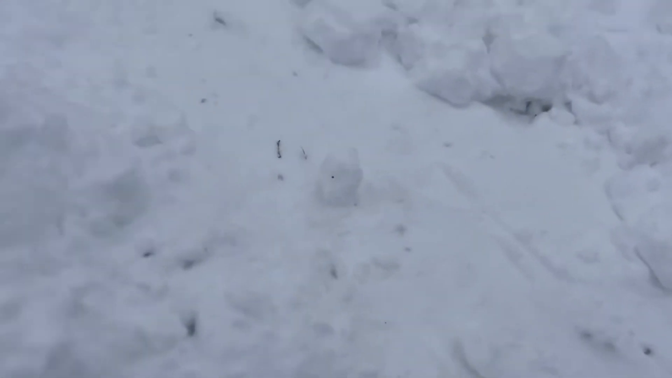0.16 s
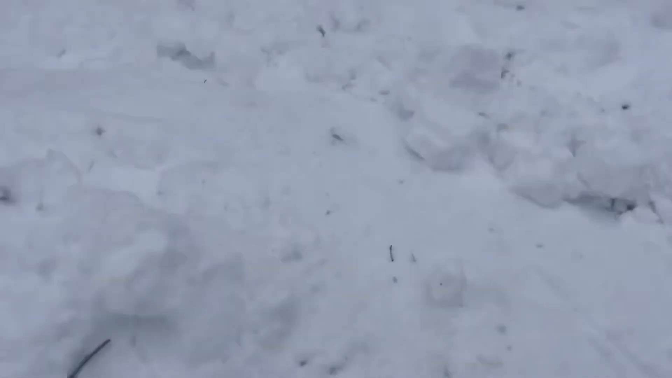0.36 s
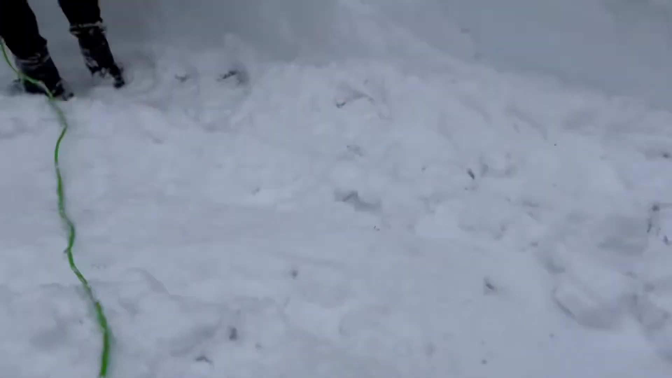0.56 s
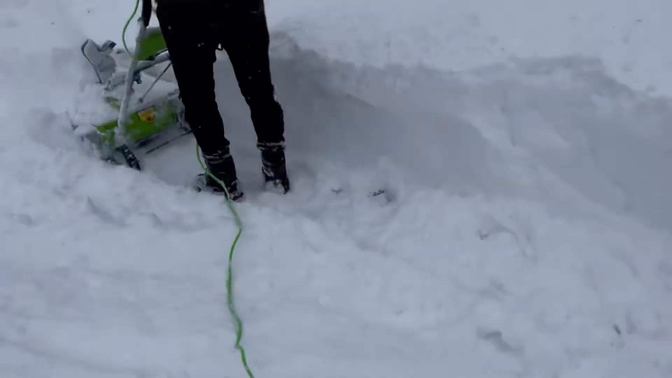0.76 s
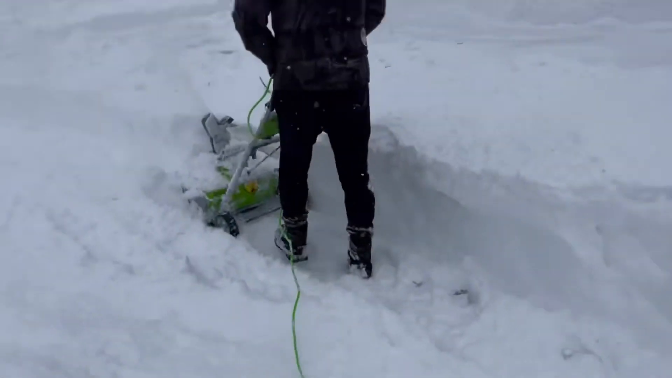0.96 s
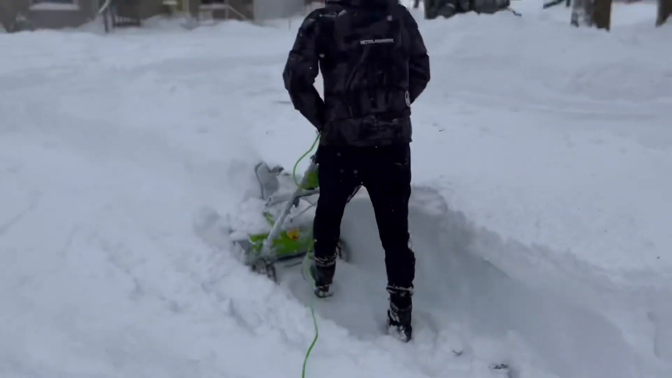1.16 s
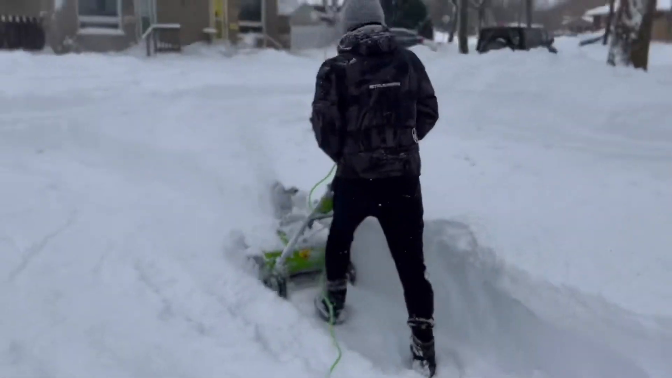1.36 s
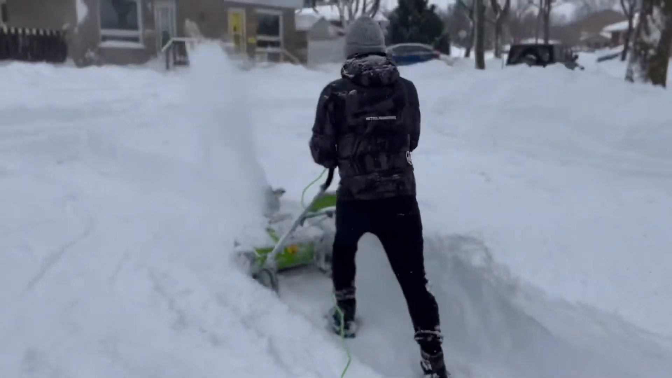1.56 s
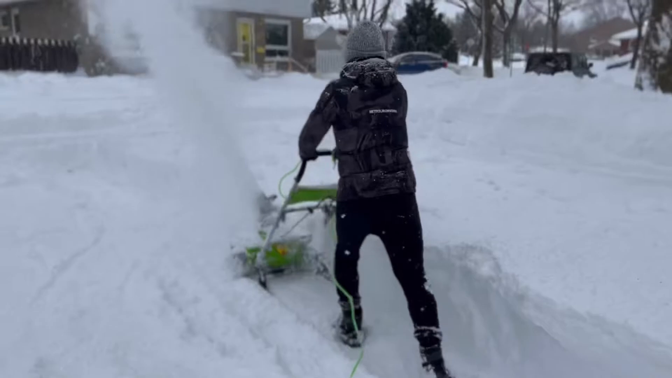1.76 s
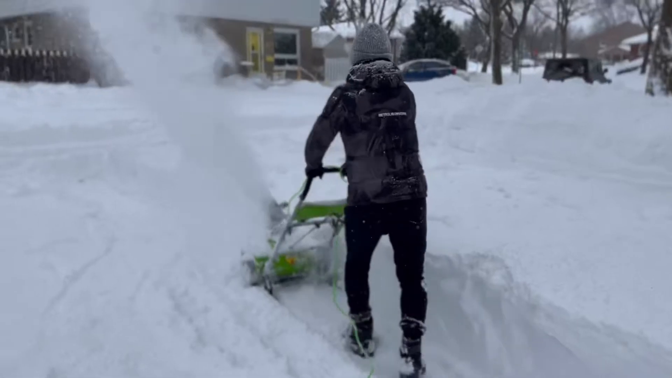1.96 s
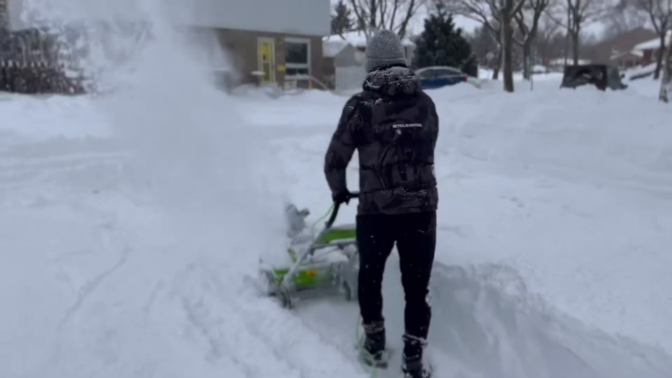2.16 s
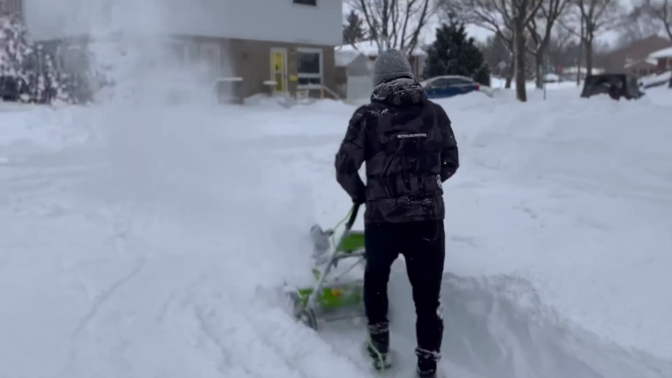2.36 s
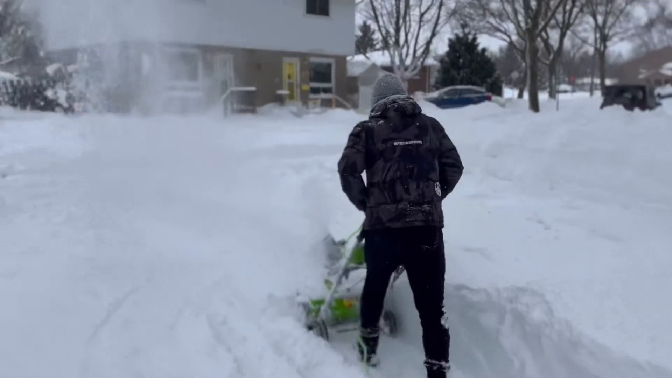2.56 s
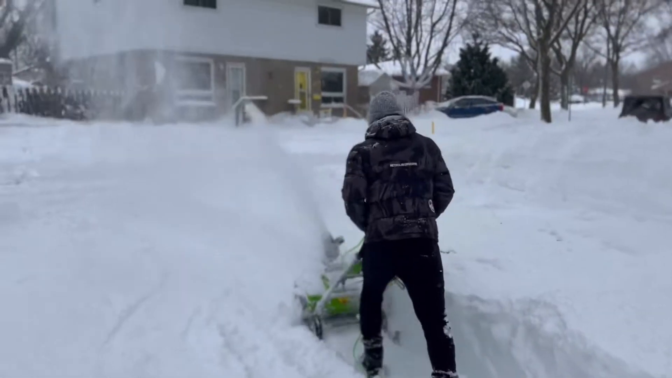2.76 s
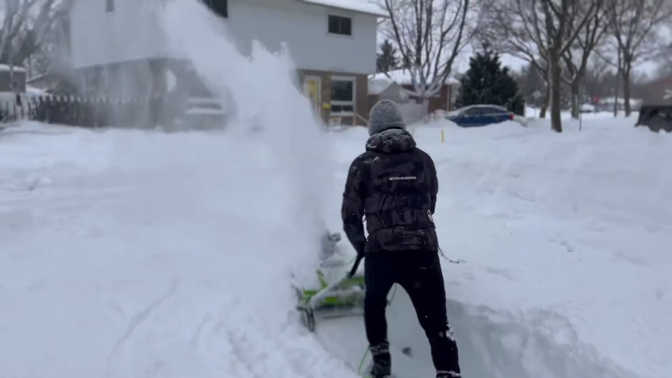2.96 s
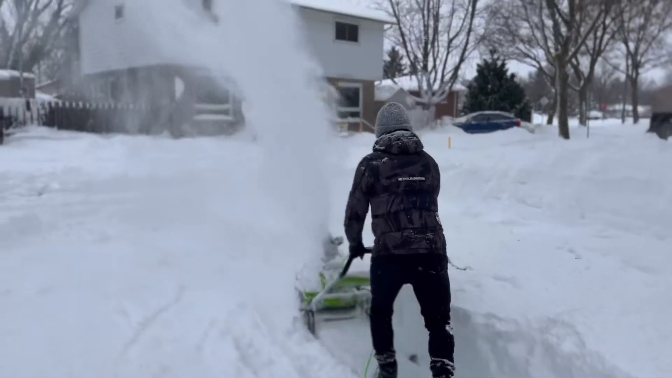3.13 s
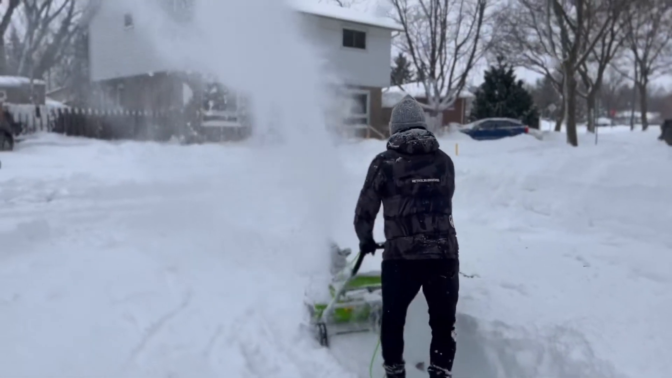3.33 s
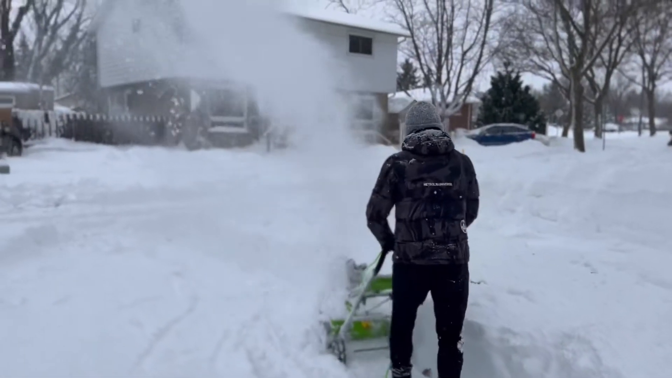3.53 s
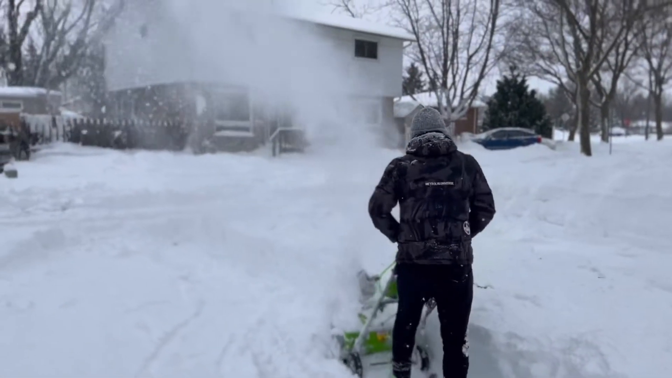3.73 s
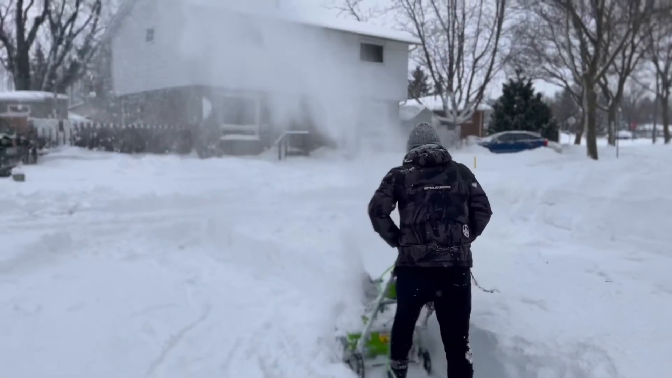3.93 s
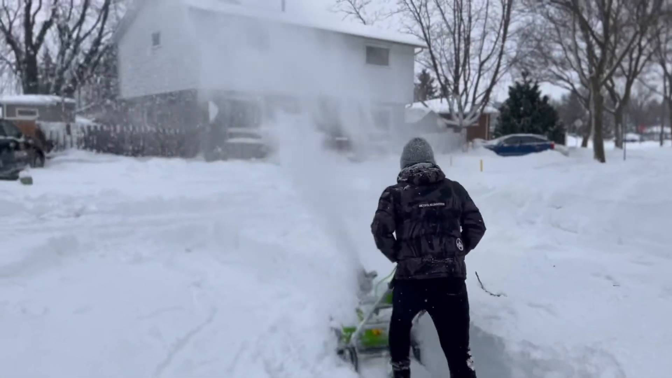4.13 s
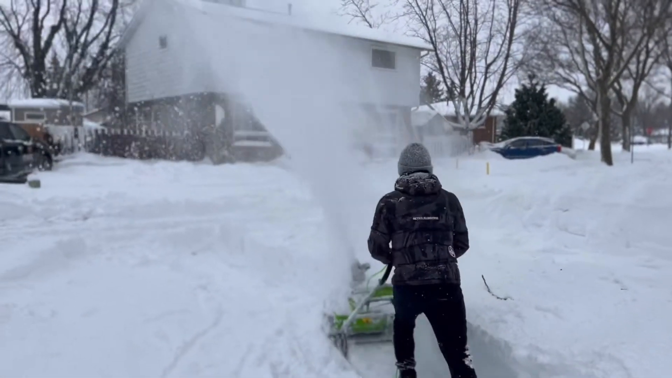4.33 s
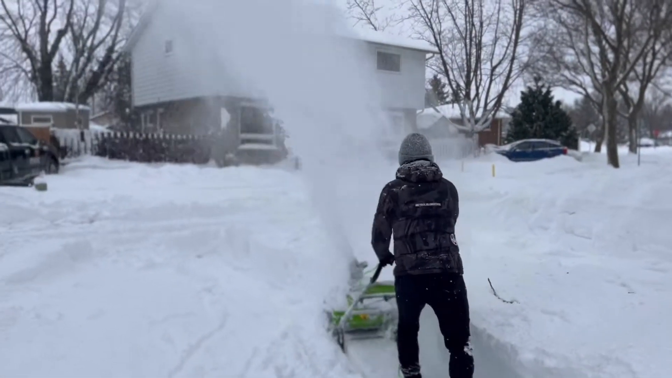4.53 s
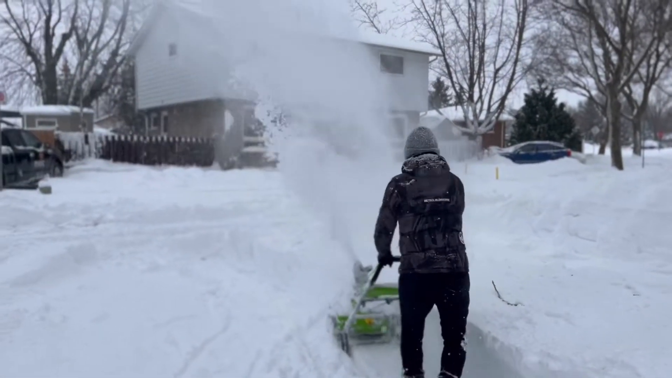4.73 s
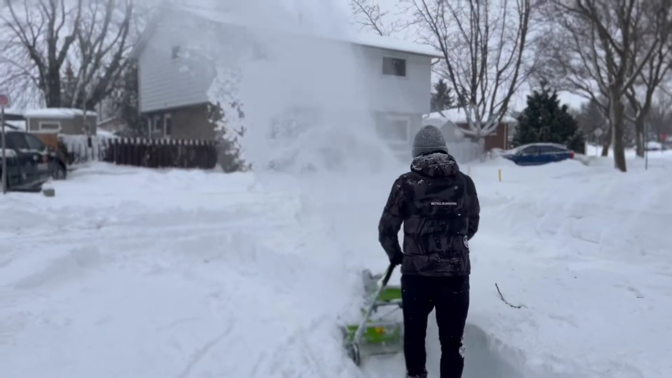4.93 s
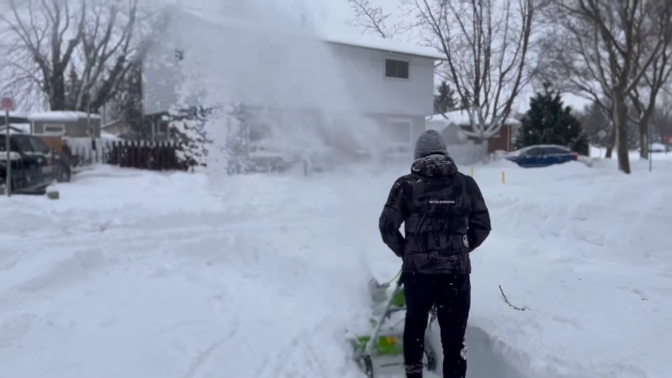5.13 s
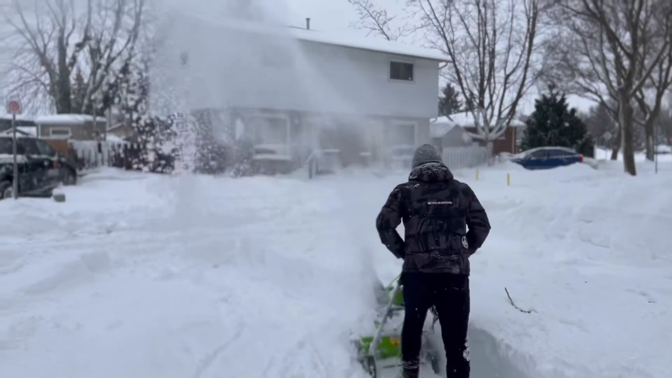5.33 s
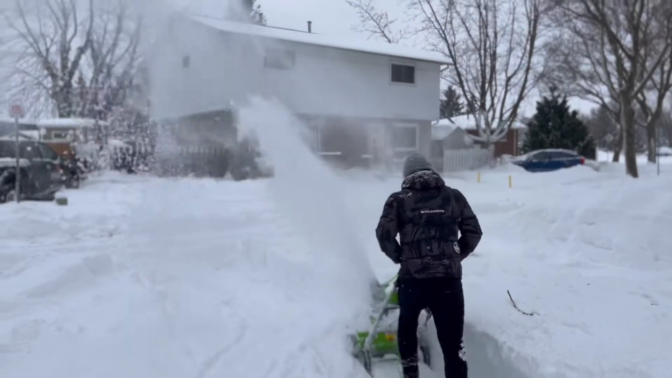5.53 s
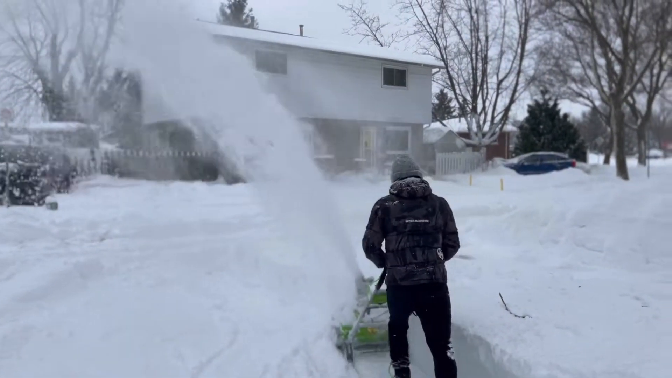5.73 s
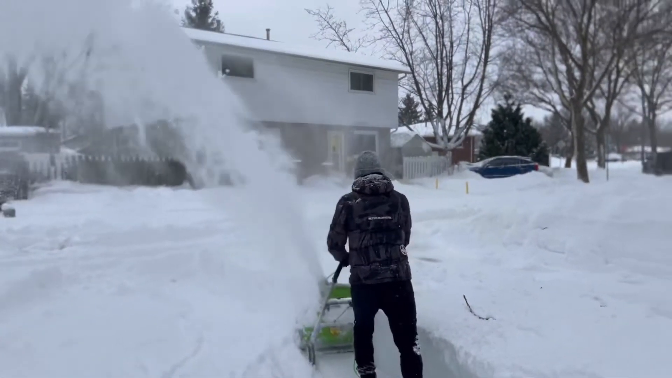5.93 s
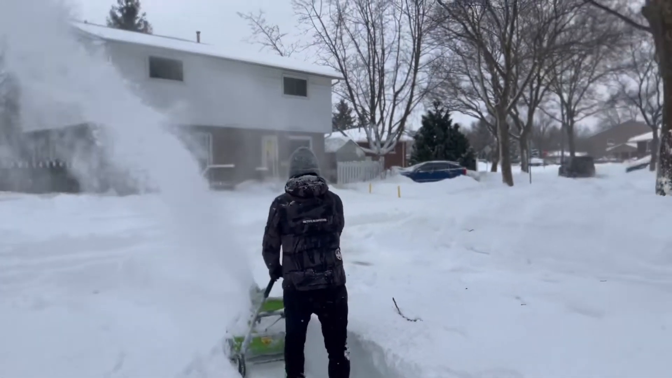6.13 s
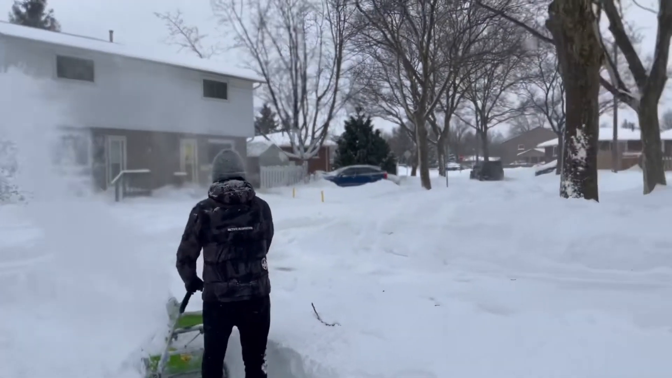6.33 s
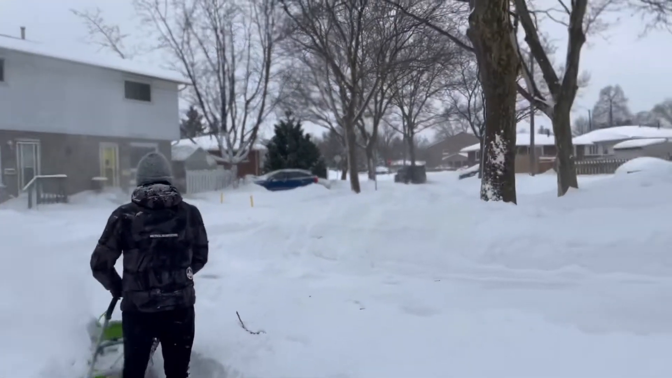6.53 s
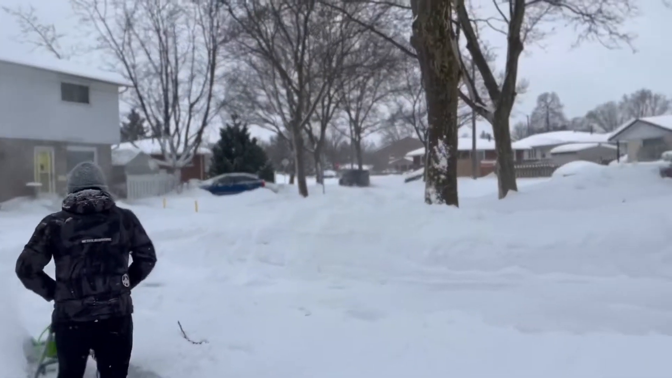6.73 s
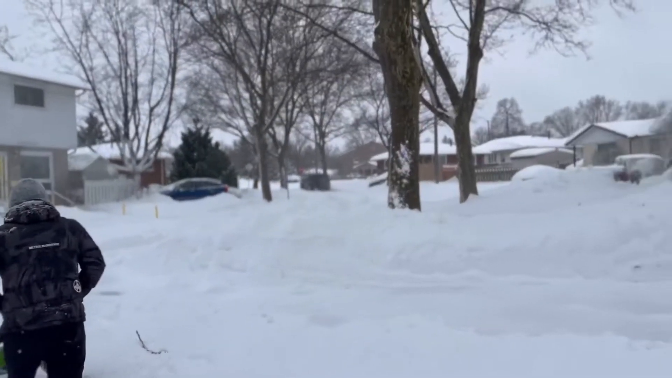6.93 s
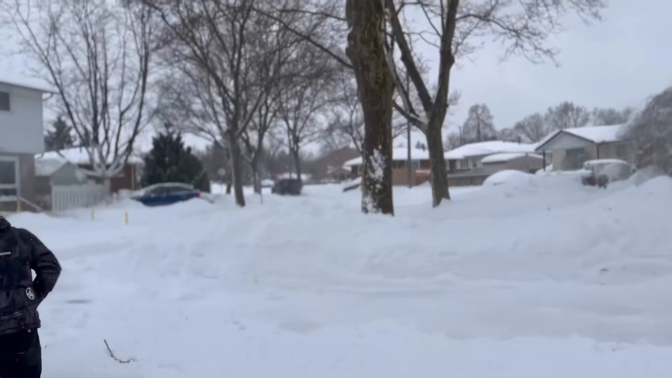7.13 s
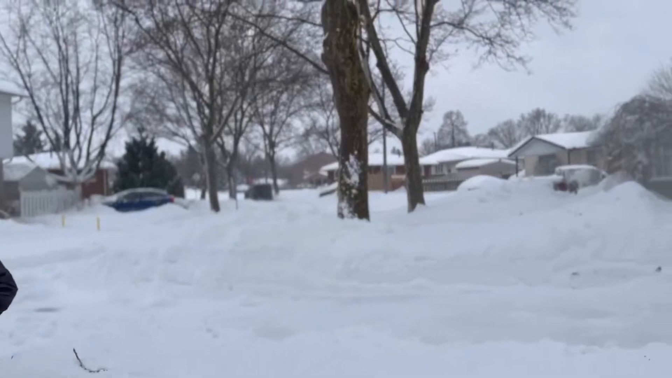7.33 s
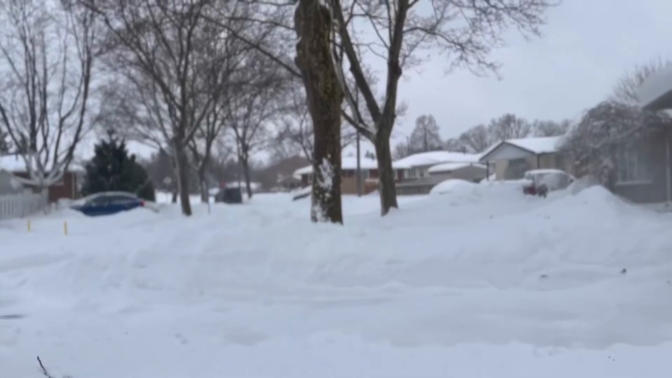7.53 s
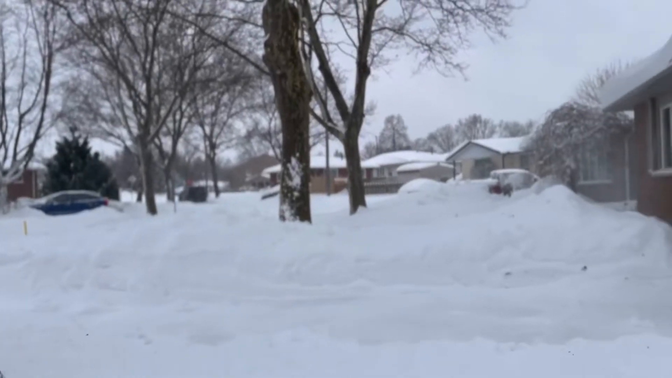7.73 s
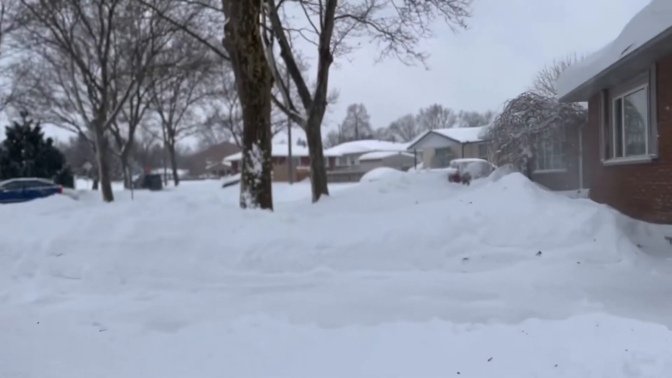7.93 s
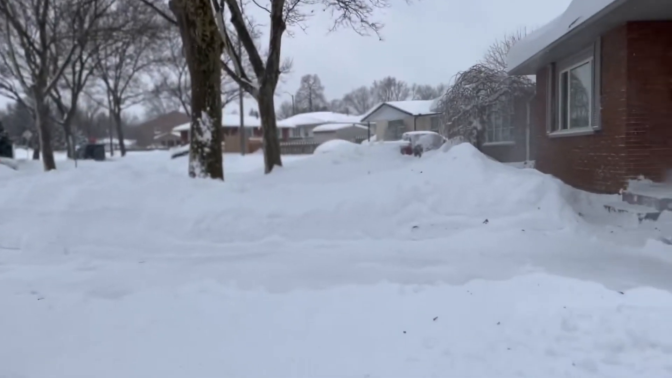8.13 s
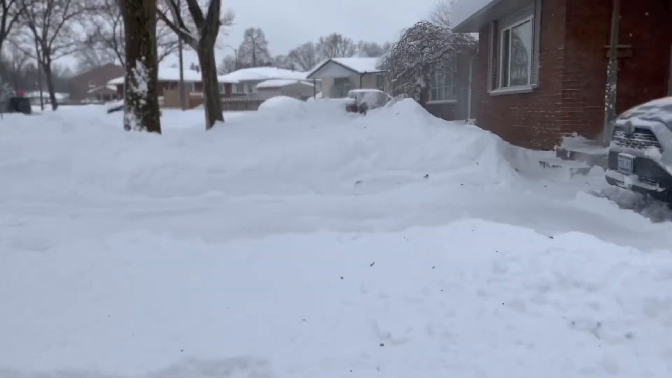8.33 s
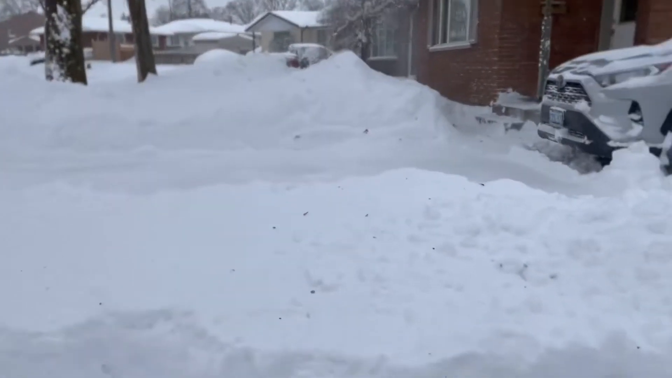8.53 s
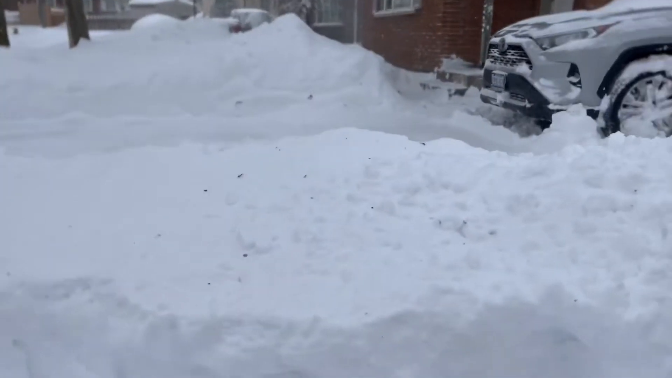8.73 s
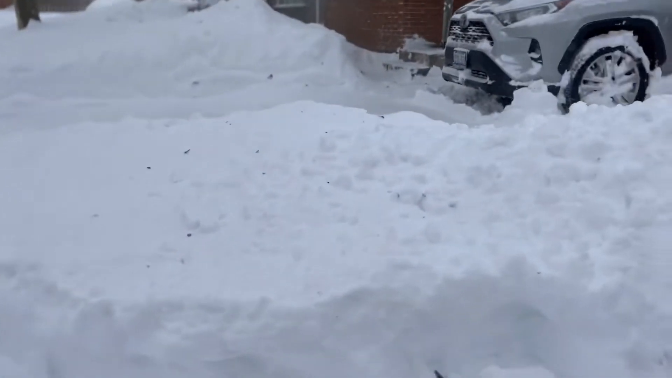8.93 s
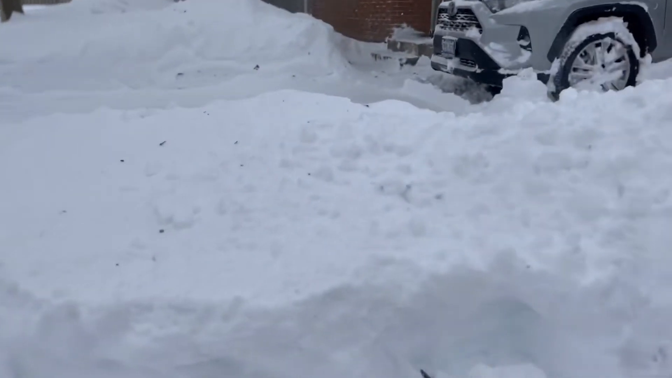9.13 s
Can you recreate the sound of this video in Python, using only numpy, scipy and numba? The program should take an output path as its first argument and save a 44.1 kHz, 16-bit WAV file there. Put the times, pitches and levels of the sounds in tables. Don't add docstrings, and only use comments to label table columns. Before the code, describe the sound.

Outdoors on a snowy street, an electric snow blower runs a few metres from a hand-held phone. Its shaft hum, fan whine and airy hiss drop in pitch and level whenever the auger bites the drift, with deep rapid thumps and snow slapping up the chute, then climb back. Ice lumps knock now and then, and wind gusts thud on the stereo microphones.

```python
import sys
import numpy as np
from scipy import signal
from scipy.fft import rfft, irfft, next_fast_len
from scipy.io import wavfile
from scipy.ndimage import uniform_filter1d, map_coordinates
from numba import njit

SR = 44100
rng = np.random.default_rng(int(sys.argv[2]) if len(sys.argv) > 2 else 0)


def generate_wav(sig):
    pcm = np.round(np.clip(np.atleast_2d(sig).T, -1, 1) * 32767).astype(np.int16)
    wavfile.write(sys.argv[1], SR, pcm)


def gain_from_db(level_db):
    decades = np.asarray(level_db, float) / 20
    return 10 ** decades


N = 409688
T = np.arange(N) / SR
PADDED = next_fast_len(N + SR // 2)
F = np.fft.rfftfreq(PADDED, 1 / SR) + 1

# (frequency [Hz], density [dB per Hz])
STREET_SPECTRUM = [(150, -27), (350, -10.5), (1200, -4.5), (3000, -13), (9000, -18.5), (16000, -19.5)]
# (frequency [Hz], density [dB per Hz])
WIND_SPECTRUM = [(20, -35), (35, -18.5), (55, -3), (100, -3.5), (180, -9), (270, -15.5), (340, -27),
                 (600, -53)]
# (peak time [s], swell [s], fade [s], level [dB])
GUSTS = [(0, .1, 0.1, -31.5), (0.441, 0.15, 0.18, -25.5), (.66, 0.075, 0.11, -30), (1.47, .05, 0.49, -21.5),
         (1.94, 0.49, .3, -27), (2.12, 0.092, 0.12, -24), (2.33, 0.068, 0.23, -22),
         (3.04, .15, 0.15, -28.5), (3.97, 0.066, 0.093, -21), (4.1, .05, 0.26, -31),
         (4.22, 0.11, 0.17, -19), (4.6, 0.59, 0.24, -30), (5.28, .25, 1, -21.5), (5.68, 0.14, 0.2, -23),
         (6.29, 0.22, .1, -22), (6.45, 0.3, 0.78, -25.5), (6.78, 0.47, 0.18, -29), (7.14, .12, 0.28, -18.5),
         (7.4, 0.25, 0.17, -16), (7.58, .1, 0.97, -28.5), (8.33, 0.19, 0.65, -27.5),
         (8.61, 0.062, 0.23, -25.5), (8.87, 0.23, 0.45, -20.5), (8.999, .06, 0.031, -18),
         (9.15, 0.16, 0.79, -36)]
# (time [s], peak level [dB], pitch [Hz], left minus right [dB])
PUFFS = [(1.87, -15, 184, 4), (2.106, -6, 176, 7), (4.495, -16, 150, -0.5), (5.819, -17, 114, -17),
         (6.262, -2.5, 92, 3), (7.449, -12, 127, 6), (7.548, -8.5, 117, 7), (7.653, -12.5, 151, 3),
         (7.696, -9, 89, 4), (8.817, -7, 85, 5), (8.995, -7, 215, 3), (9.173, -18, 182, 15)]
# (time [s], delay [ms])
GROUND_DELAY = [(0, 3.1), (.6, 2.33), (1.5, 2.28), (4, 2.2), (6, 1.76), (7, 2.1), (9.29, 2.57)]
# (time [s], right microphone lag [ms], housing side [dB], motor side [dB], cowl opening [dB])
PLACE = [(0, 0.448, -9, 0, 4.5), (.33, 0.45, -2, 3.5, 6), (.5, 0.444, 3, 3.5, 4), (.7, 0.28, 5.5, 2.5, 1.5),
         (.9, 0.097, 0.5, 1, 3.5), (1.3, 0.094, 4, -1, 4.5), (2.1, 0.094, 0.5, 2, 1.5),
         (2.5, 0.071, 1, 1, 3.5), (3.5, 0.053, -5, -4, 0.5), (4.1, 0.019, 0, -5, 2),
         (5, 0.044, -3, -0.5, 1), (5.5, 0.022, 0, -7, 3), (5.9, .061, -2.5, -6, 7.5),
         (6.4, 0.28, -4, 4.5, -1), (7, 0.32, -2, 2.5, -2.5), (7.7, .41, -2, 0.5, 6.5),
         (8.3, 0.48, -4, 0.5, 6.5), (9.29, 0.554, -8.5, -3, 2)]
# (frequency [Hz], left minus right [dB])
MICROPHONE_SHADE = [(60, -1), (110, 0), (200, -1.5), (380, 2), (700, 4.5), (1290, 3.5), (2380, -3),
                    (4400, 11), (8120, 6.5), (15000, -48)]
# (frequency [Hz], gain [dB])
SUM_TOP = [(9400, .5), (9900, -11.5), (11000, -7), (12900, -6.5), (13600, -35), (14600, -9), (15750, -9),
           (16000, -50)]
# (frequency [Hz], gain [dB])
DIFFERENCE_TOP = [(9000, -0.5), (10400, 5.5), (11000, -10), (12900, -3), (13600, -36), (14600, -8),
                  (15750, -15), (16000, -52)]
# (time [s], ring level [dB], pitch [Hz], crack level [dB])
KNOCKS = [(1.965, -20, 650, -53), (2.596, -11, 570, -40), (2.838, -29, 530, -18.5), (2.93, -46, 600, -20.5),
          (3.073, -22.5, 583, -45), (3.173, -24, 580, -50), (3.818, -9.5, 600, -49), (3.878, -13, 597, -38),
          (4.21, -33, 600, -23), (4.27, -26, 520, -22.5), (5.238, -13, 605, -40)]
# (frequency [Hz], width [Hz], level [dB])
COWL = [(1950, 390, 1), (2507, 220, 3.5), (2930, 185, 2.5), (3400, 290, -3.5)]
# (frequency [Hz], width [Hz], level [dB])
VENTS = [(4430, 340, 0), (4833, 220, 3.5), (5490, 450, 2.5), (6086, 240, 6), (6420, 830, 2.5),
         (7440, 720, 3), (8114, 570, 0), (8117, 104, 5.5), (8790, 840, 0)]
# (frequency [Hz], density [dB per Hz])
AIR_HISS = [(180, -39), (300, 4), (440, -10.5), (1510, -10), (2280, -9), (3640, -9.5), (8090, -25),
            (11500, -34.5), (13800, -56), (14500, -49), (16000, -43)]
# (peak time [s], swell [s], fade [s], level [dB])
GRIT = [
    (2.33, .15, 0.089, -40),
    (2.92, 0.56, .2, -44),
    (4.2, 0.31, 0.028, -48),
]
# (start time [s], rise [s], fall [s], peak drag [Hz per s])
BITES = [(1.25, .15, .1, 150), (1.42, .11, .19, 1650), (1.619, .065, .267, 615), (2.541, .122, .403, 496),
         (2.767, .09, .33, 770), (3.799, .374, .253, 451), (4.185, .037, .207, 980),
         (4.31, .094, .215, 584), (5.188, .311, .298, 665), (5.49, .29, .25, 690), (6.918, .301, .443, 744),
         (7.269, .223, .364, 561), (9.061, .198, .175, 1367)]
# (peak time [s], swell [s], fade [s], thump level [dB], slap level [dB])
CLUMPS = [(1.32, 0.51, 0.28, -20, -30), (1.502, 0.047, 0.079, 2, -21.5), (1.62, 0.11, 0.13, -22.5, -54),
          (2.35, 0.04, 0.1, -33, -38), (2.698, .12, 0.088, -2.5, -20), (2.848, 0.14, 0.17, -3.5, -25.5),
          (3.24, 0.17, 0.17, -15.5, -33.5), (3.96, 0.59, 0.21, -25, -26.5),
          (4.06, 0.24, 0.12, -14.5, -28.5), (4.14, 0.15, 0.14, -9, -26.5), (4.24, 0.3, 0.098, -17.5, -31),
          (4.33, 0.14, 0.1, -19, -60), (5.35, .2, 0.3, -15.5, -22), (5.43, 0.058, 0.24, -7, -25.5),
          (5.54, 0.3, 0.13, -6, -45), (5.64, 0.17, 0.21, -10, -47), (5.77, 0.24, 0.11, -18, -54),
          (5.92, 0.2, 0.08, -21.5, -60), (6.26, 0.057, 0.052, -17, -34), (7.141, 0.21, 0.31, -5, -22),
          (7.291, 0.2, 0.11, 1.5, -28), (7.43, .2, 0.16, -20.5, -54), (9.03, .04, 0.18, -25, -34),
          (9.19, 0.045, 0.034, -3, -23.5)]
# (frequency [Hz], width [Hz], level [dB])
HOUSING = [(91.36, 3.4, 11.5), (112.6, 17, 6), (137, 37, -2.5), (219, 23.6, 4), (360, 750, -39),
           (530, 26, -31), (570, 170, -15)]
# (frequency [Hz], width [Hz], level [dB])
PACKED_HOUSING = [(118.5, 39.3, 1.5), (212.8, 44, 3)]
# (frequency [Hz], width [Hz], level [dB])
CHUTE = [(416, 520, 3.5), (652, 590, 10.5), (880, 630, 0), (1276, 56, -3)]
# (frequency [Hz], gain [dB])
SOFT_BLOW = [(300, 0), (800, -6), (1200, -22), (2500, -55)]

BELT_RATIO, FAN_BLADES = 6.52, 14
FREE_HZ, SPIN_UP_S = 286.5, 0.2624
EDGE_DB = 18
CALM_DB = -34
SCATTER_DRIFT_S = 5
HUM_DB, HUM_PER_OCTAVE = -22.5, 8.2
THUMP_DB, THUMP_PER_OCTAVE = -17.5, 22
SLAP_DB, SLAP_PER_OCTAVE = -32, 8.2
ROAR_DB, ROAR_PER_OCTAVE = -30, 19
HISS_DB, HISS_PER_OCTAVE = -36, 21
WHINE_DB = -32.5
HUM_STRAIN_DB, ROAR_STRAIN_DB, HISS_STRAIN_DB, WHINE_STRAIN_DB = 5, 3, 3.5, -4.5
IDLE_FADE_DB_PER_S, IDLE_FADE_FROM_S, IDLE_FADE_FOR_S = 2.5, 0.83, 4.4


def noise():
    return rng.standard_normal(N)


def level(x, db):
    return x * gain_from_db(db) / np.sqrt(np.mean(x ** 2))


def steady(x):
    return x / np.sqrt(uniform_filter1d(x ** 2, size=5000) + 1e-12)


def walk(rate):
    hold = int(SR / rate)
    steps = np.repeat(rng.standard_normal(N // 100)[:N // hold + 1], hold)
    return 1.32 * uniform_filter1d(uniform_filter1d(steps, hold), hold)[:N]


def swells(base_db, events, column):
    power = gain_from_db(2 * base_db) + 0 * T
    for event in events:
        peak_s, swell_s, fade_s = event[:3]
        away = np.maximum((peak_s - T) / swell_s, (T - peak_s) / fade_s)
        power += gain_from_db(2 * (event[column] - EDGE_DB * away))
    return 10 * np.log10(power)


def colour(x, points, share=1):
    hz, db = np.transpose(points)
    gain_db = share * np.interp(np.log(F), np.log(hz), db)
    return irfft(rfft(x, PADDED) * gain_from_db(gain_db), PADDED)[..., :N]


def ring(x, modes):
    gain = 0
    for k, (hz, width, db) in enumerate(modes):
        gain = gain + (-1) ** k * gain_from_db(db) / (1 + 1j * (F - hz ** 2 / F) / width)
    return irfft(rfft(x, PADDED) * gain, PADDED)[..., :N]


@njit
def svf(x, hz, width):
    y, band, low = np.empty(len(x)), 0., 0.
    for i in range(len(x)):
        g, k = np.tan(np.pi * hz[i] / SR), width / hz[i]
        v = (band + g * (x[i] - low)) / (1 + g * (g + k))
        band, low, y[i] = 2 * v - band, low + 2 * g * v, k * v
    return y


def street():
    mid, side = (level(colour(noise(), STREET_SPECTRUM), -44) for _ in range(2))
    return mid + gain_from_db(1) * side * np.array([[1], [-1]])


def wind():
    gust = gain_from_db(swells(CALM_DB, GUSTS, column=3) + 6)
    eddies = (ring(noise() * gain_from_db(2.2 * walk(22)), [(200, 900, 0)]) for _ in range(2))
    mid, side = (level(colour(eddy, WIND_SPECTRUM + [(2000, -90)]), 0) for eddy in eddies)
    out = gust * (mid + gain_from_db(-7.5) * side * np.array([[1], [-1]]))
    t = T[:SR // 10]
    envelope = np.exp(-t / 0.017) * (1 - np.exp(-t / 0.0017))
    for s, db, hz, pan_db in PUFFS:
        thud = np.sin(2 * np.pi * hz * (t + 0.0052 * (1 - np.exp(-t / 0.0038)))) * envelope
        start = int(s * SR)
        out[:, start:start + len(t)] += gain_from_db(db + np.array([[pan_db], [-pan_db]]) / 2) * thud
    return out


def scatter(blower):
    t = T[:SR // 8]
    tails = rng.standard_normal((2, 2, len(t))) * np.exp(-t / 0.03) * (t > 0.003)
    thin = ring(blower, [(4020, 30000, 0.0089)])
    drift = 2 * np.pi * T / SCATTER_DRIFT_S
    out = np.zeros((2, N))
    for share, tail in zip((np.sin(drift), np.cos(drift)), tails):
        out += signal.fftconvolve((thin * share)[None], tail * gain_from_db(-33), axes=1)[:, :N]
    return out


def ground_echo(blower):
    late = np.arange(N) - np.interp(T, *np.transpose(GROUND_DELAY)) * SR / 1000
    return 0.27 * map_coordinates(ring(blower, [(4300, 3700, 0)]), [late])


def two_microphones(blower, lag_ms):
    half_lag = lag_ms * SR / 1000 / 2
    left = map_coordinates(blower, [np.arange(N) + half_lag], mode="nearest")
    right = map_coordinates(blower, [np.arange(N) - half_lag], mode="nearest")
    return np.array([colour(left, MICROPHONE_SHADE, 0.5), colour(right, MICROPHONE_SHADE, -0.5)])


def knocks():
    out, t = np.zeros(N), T[:SR // 20]
    for s, db, hz, crack_db in KNOCKS:
        grain = uniform_filter1d(rng.standard_normal(len(t)), size=3)
        crack = gain_from_db(crack_db) * grain * np.exp(-t / 0.0026)
        start = int(s * SR)
        out[start:start + len(t)] += gain_from_db(db) * np.sin(2 * np.pi * hz * t) * np.exp(-t / 0.0037) + crack
    return out


def fan(hz, turns, roar_db, hiss_db, whine_db):
    once_a_turn = np.sin(2 * np.pi * turns)
    roar = level(ring(ring(noise(), COWL), [(2583, 830, 0)]), 0) * gain_from_db(roar_db - 5 + 1.3 * walk(23))
    air = level(colour(noise(), AIR_HISS), 0) * gain_from_db(0.9 * walk(30))
    air += level(ring(ring(noise(), VENTS), VENTS), -2) * gain_from_db(1.1 * walk(20))
    air -= ring(air, [(8330, 25000, 0.0039)]) * (1 - gain_from_db(-0.8 * T))
    blades = (1 + 0.9 * once_a_turn) * np.sin(2 * np.pi * FAN_BLADES * turns + 0.5 * walk(100))
    blades += level(svf(noise(), FAN_BLADES * hz, 200.), -7)
    whine = ring(ring(blades, [(2330, 255, 0.0058)]), [(1950, 253, 0.0058)])
    whine *= gain_from_db(whine_db + 3.3 * walk(30))
    return (1 + 0.14 * once_a_turn) * (roar + gain_from_db(hiss_db + 3.5) * air) + whine


def hum(turns, db):
    phase = 2 * np.pi * turns + 0.33 * walk(40)
    octave = gain_from_db(-14) * ring(np.sin(2 * phase), [(520, 39, 0.0036)])
    return gain_from_db(db + walk(16)) * np.sqrt(2) * (np.sin(phase) + octave)


def auger(turns, idle_db, thump_db, slap_db):
    strokes = 2 * turns / BELT_RATIO + 0.006 * walk(30)
    count = strokes.astype(int)
    uneven = 0.6 * rng.standard_normal(N // 100) + 0.6 * (np.arange(N // 100) % 2)
    size = gain_from_db(uneven)[count]
    pulses = np.diff(count, prepend=0) * size
    rattle = gain_from_db(-43) * noise()
    blows = colour(pulses + rattle, SOFT_BLOW)
    idle = steady(ring(blows, HOUSING))
    loaded = steady(ring(ring(blows, PACKED_HOUSING), [(152, 370, 0)]))
    thump = gain_from_db(idle_db) * idle + gain_from_db(thump_db) * loaded
    burst = uniform_filter1d(size * (0.9 + np.exp(-(strokes % 1) / 0.4)), size=90)
    snow = burst * noise() + gain_from_db(27.5) * pulses
    slap = steady(ring(ring(snow, CHUTE), [(650, 1250, 0)]))
    return gain_from_db(-5.5) * thump + gain_from_db(slap_db) * slap


def shaft():
    drag = np.zeros(N)
    for s, rise, fall, peak in BITES:
        drag += peak * np.interp(T, [s, s + rise, s + rise + fall], [0, 1, 0])
    drag = uniform_filter1d(drag, size=2000)
    return drag, FREE_HZ - signal.lfilter([1 / SR], [1, 1 / (SR * SPIN_UP_S) - 1], drag)


def snow_blower(housing_db, motor_db, cowl_db):
    drag, hz = shaft()
    strain, octaves = drag / 1000, np.log2(hz / FREE_HZ)
    turns = np.cumsum(hz) / SR
    hum_db = HUM_DB + HUM_PER_OCTAVE * octaves + HUM_STRAIN_DB * strain + housing_db
    dug_in_s = np.clip(T - IDLE_FADE_FROM_S, 0, IDLE_FADE_FOR_S)
    idle_db = THUMP_DB + THUMP_PER_OCTAVE * octaves - IDLE_FADE_DB_PER_S * dug_in_s
    thump_db = swells(idle_db - 14, CLUMPS, column=3)
    slap_db = swells(SLAP_DB + SLAP_PER_OCTAVE * octaves + 0.61 * housing_db, CLUMPS, column=4)
    roar_db = ROAR_DB + ROAR_PER_OCTAVE * octaves + ROAR_STRAIN_DB * strain + motor_db + cowl_db
    air_db = HISS_DB + HISS_PER_OCTAVE * octaves + HISS_STRAIN_DB * strain + motor_db
    hiss_db = swells(air_db, GRIT, column=3)
    whine_db = WHINE_DB + WHINE_STRAIN_DB * strain + 0.36 * motor_db + 0.78 * cowl_db
    motor = hum(turns, hum_db) + fan(hz, turns, roar_db, hiss_db, whine_db)
    return motor + auger(turns, idle_db, thump_db, slap_db) + knocks()


def scene():
    s, *columns = np.transpose(PLACE)
    lag_ms, housing_db, motor_db, cowl_db = (np.interp(T, s, c) for c in columns)
    blower = snow_blower(housing_db, motor_db, cowl_db)
    blower += ground_echo(blower)
    return two_microphones(blower, lag_ms) + scatter(blower) + wind() + street()


def band_limit(x):
    return signal.sosfilt(signal.butter(12, 16880, fs=SR, output="sos"), x)


def record(dry):
    both = colour(dry[0] + dry[1], SUM_TOP) / 2
    apart = colour(dry[0] - dry[1], DIFFERENCE_TOP) / 2
    mix = np.clip([both + apart, both - apart], -1, 1)
    return band_limit(mix)


dry = scene()
out = record(dry)
generate_wav(out)
```